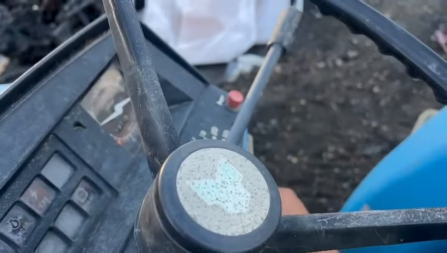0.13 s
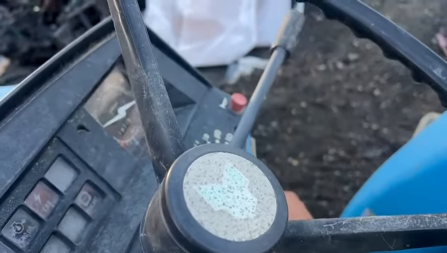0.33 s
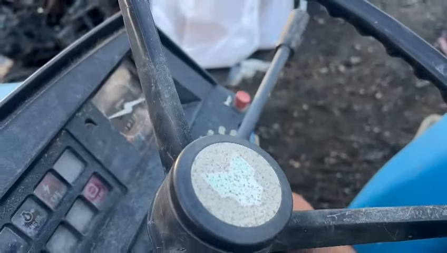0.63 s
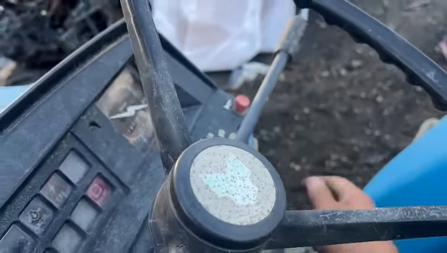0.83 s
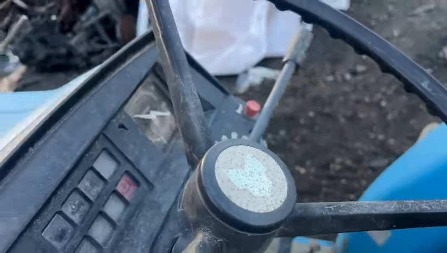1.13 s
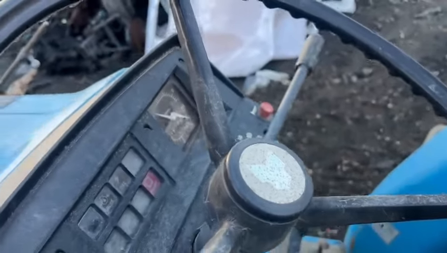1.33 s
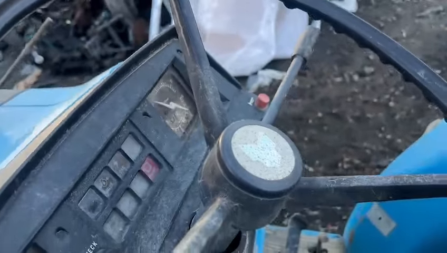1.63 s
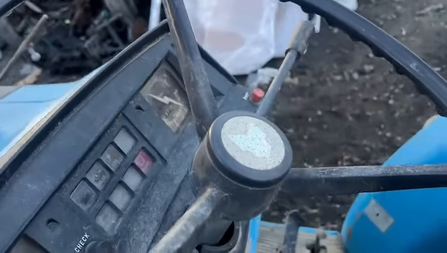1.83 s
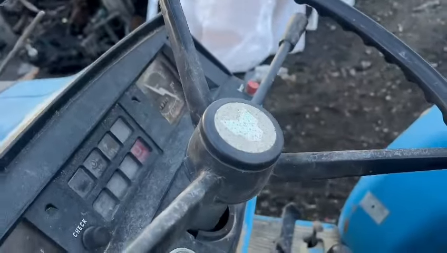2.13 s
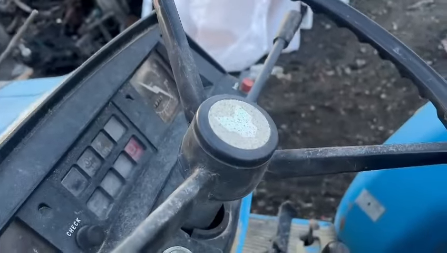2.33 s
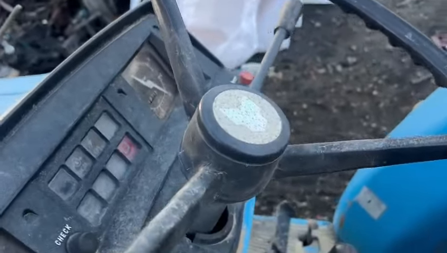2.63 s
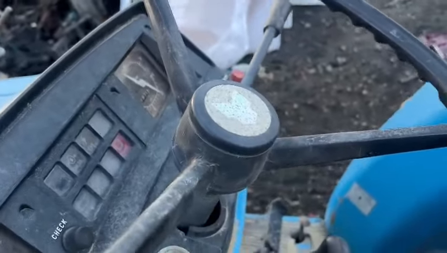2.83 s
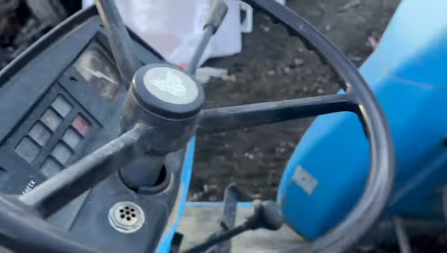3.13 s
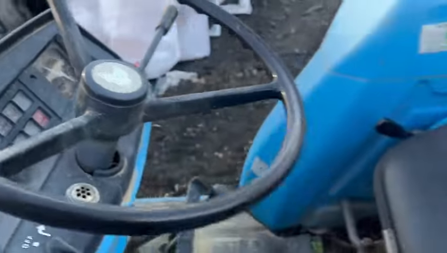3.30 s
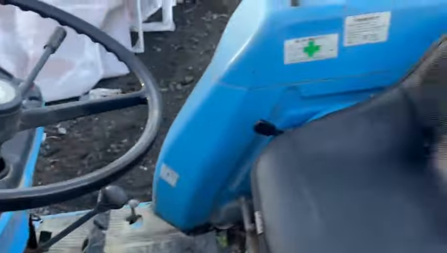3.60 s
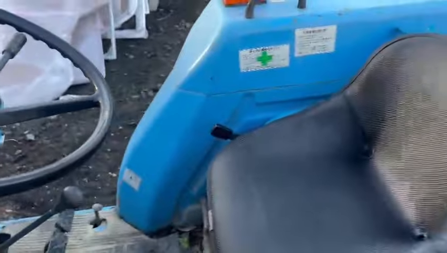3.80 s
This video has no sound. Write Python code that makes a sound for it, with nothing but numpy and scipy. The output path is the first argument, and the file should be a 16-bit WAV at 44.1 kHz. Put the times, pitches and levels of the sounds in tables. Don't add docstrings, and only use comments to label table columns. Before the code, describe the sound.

A diesel tractor engine clunks, cranks, catches within a second and settles into a rattling idle.

```python
import sys
import numpy as np
from scipy import signal
from scipy.fft import rfft, irfft, next_fast_len
from scipy.io import wavfile
from scipy.ndimage import uniform_filter1d

SR = 44100
rng = np.random.default_rng(int(sys.argv[2]) if len(sys.argv) > 2 else 0)


def gain_from_db(level_db):
    decades = np.asarray(level_db, float) / 20
    return 10 ** decades


def transcribe(signal):
    frames = np.atleast_2d(signal).T
    limited = np.clip(frames, -1, 1)
    pcm = np.round(limited * 32767).astype(np.int16)
    wavfile.write(sys.argv[1], SR, pcm)


N = 174636
TIME_S = np.arange(N) / SR


def level(x, rms_db):
    return x * gain_from_db(rms_db) / np.sqrt(np.mean(x ** 2))


def noise():
    return rng.standard_normal(N)


def band(x, hz, width_hz):
    return signal.lfilter(*signal.iirpeak(min(hz, 0.45 * SR), hz / width_hz, fs=SR), x)


def body(x, modes):
    out = 0
    for k, (hz, width_hz, db) in enumerate(modes):
        out = out + (-1) ** k * gain_from_db(db) * band(x, hz, width_hz)
    return out


def fade(x, decay_s):
    return signal.lfilter([1], [1, -np.exp(-1 / (decay_s * SR))], x)


def late(x, lag_s):
    n = next_fast_len(N + 256)
    hz = np.arange(n // 2 + 1) * SR / n
    return irfft(rfft(x, n) * np.exp(-2j * np.pi * hz * lag_s), n)[:N]


def walk(rate_hz):
    hold = int(SR / rate_hz)
    steps = np.repeat(rng.standard_normal(N // hold + 1), hold)
    return 0.95 * uniform_filter1d(uniform_filter1d(steps, hold), hold)[:N]


def curves(table):
    start_s, *columns = np.array(table).T
    return [np.interp(TIME_S, start_s, column) for column in columns]


def hiss(spectrum, flicker_db):
    table_hz, table_db = np.array(spectrum).T
    out = 0
    for hz in 30 * 2 ** np.arange(0, 8.8, 0.5):
        db = np.interp(np.log(hz), np.log(table_hz), table_db, left=-60)
        gain = gain_from_db(db + flicker_db * walk(9))
        out = out + gain * band(band(noise(), hz, hz / 2), hz, hz / 2)
    return out


def beats(cycle, angles, levels_db, scatter_db):
    jitter_cycles = 0.0019
    out, turns = np.zeros(N), np.arange(np.floor(cycle[0]), cycle[-1])
    for angle, db in zip(angles, levels_db):
        z = rng.standard_normal((len(turns), 2))
        passed = turns + angle + jitter_cycles * z[:, 0]
        at = np.interp(passed, cycle, np.arange(N), left=-1, right=-1).astype(int)
        inside = at >= 0
        np.add.at(out, at[inside], gain_from_db(db + scatter_db * z[inside, 1]))
    return out


# start_s, firing_hz
FIRING_RATE = [(0, 13), (.3, 15.9), (.4, 16.2), (.56, 20.2), (.7, 25.6), (.83, 30.9), (.95, 36.1),
               (1, 37.1), (1.32, 37.2), (1.49, 36.4), (1.6, 36.22), (3.3, 36.23), (3.96, 36.18)]


def crankshaft():
    firing_hz, = curves(FIRING_RATE)
    cycle = np.cumsum(firing_hz) / SR / 4
    return firing_hz, cycle - cycle[int(1.6 * SR)]


# firing_multiple, level_db
DRONE_LINES = [(0.5, -30), (0.75, -23), (1, 0.5), (1.5, -17), (1.75, -45), (2, -5.5), (2.25, -17),
               (2.5, -13), (2.75, -18.5), (3, 0), (3.25, -12.5), (3.5, -10), (3.75, -21), (4, 1.5),
               (4.25, -10), (4.5, -4.5), (4.75, -6), (5, -15.5), (5.25, -12.5), (5.5, -15), (5.75, -19.5),
               (6, -24.5), (6.5, -16.5), (7, -15), (8, -14.5), (9, -15), (10.5, -12), (10.75, -13.5)]
# start_s, load_db
LOAD = [
    (.65, 8),
    (.85, 6),
    (1, 3.5),
    (1.4, 3.5),
    (1.6, 0),
]


def exhaust_drone(firing_hz, cycle):
    waver_db, even_per_db, deepen_per_db, favoured_multiple = 1.4, 1.2, 0.9, 2.5
    lead_turns, spread_turns = 0.58, -0.158
    load_db, = curves(LOAD)
    out = 0
    for k, db in DRONE_LINES:
        in_between = (k % 1 > 0) * even_per_db
        off_favour = deepen_per_db * (min(abs(k - favoured_multiple), 3) - 1)
        gain = gain_from_db(db + waver_db * (walk(5) + walk(14)) - (in_between + off_favour) * load_db)
        out = out + gain * np.sin(2 * np.pi * k * (4 * cycle + lead_turns + spread_turns * k))
    catch_hz = 23.5
    return level(out, 0) / (1 + (catch_hz / firing_hz) ** 8)


# crank_angle_cycles, level_db
FIRINGS = [(0.069, -4.5), (0.327, -3), (0.572, -3), (0.816, 1)]
# crank_angle_cycles, level_db
INTAKES = [(0.201, -2), (0.437, -9.5), (.66, -5), (0.962, -16)]
# mode_hz, width_hz, level_db
PIPE = [(57, 49, -4.5), (176, 67, -0.5), (225, 17.6, 0), (252.4, 19.7, -3.5), (291, 37, -4.5),
        (318.4, 23, -1), (383, 17.3, -3.5)]
# mode_hz, width_hz, level_db
AIRBOX = [(207, 63, 4), (310, 266, -10.5), (377.5, 12, 1), (452, 42, -15), (605, 38, -9.5)]


def thumps(firing_hz, cycle):
    scatter_db = 2
    pipe = level(body(beats(cycle, *zip(*FIRINGS), scatter_db), PIPE), 0)
    air = level(body(beats(cycle, *zip(*INTAKES), scatter_db), AIRBOX), -7.5)
    rumble = level(body(noise(), PIPE + AIRBOX), -12)
    return gain_from_db(0.5) * ((pipe + air) * np.sqrt(36 / firing_hz) + rumble)


# crank_angle_cycles, ring_db, puff_db
KNOCKS = [(0.112, 1.5, -2), (0.231, -0.5, 25.5), (0.351, 1.5, 11), (.492, 0.5, 22.5), (.6, 0, 6.5),
          (.672, -12, 15.5), (.745, 4, 9.5), (0.841, -2, 12), (0.871, 0, 13), (0.991, -3.5, 24)]
# mode_hz, width_hz, level_db
BLOCK = [(990, 180, -10.5), (1300, 300, -15.5), (1710, 130, -5.5), (2323, 40, 3.5), (2260, 1900, -14),
         (2552, 280, -1)]
# band_hz, width_hz, level_db
GAS = [(4540, 540, 3), (5410, 540, 6), (7840, 770, -1.5), (10380, 4800, -8.5)]


def injector_knocks(cycle):
    scatter_db = 2.5
    angles, ring_db, puff_db = zip(*KNOCKS)
    ring = body(fade(beats(cycle, angles, ring_db, scatter_db), 0.0036) * noise(), BLOCK)
    gas = body(fade(beats(cycle, angles, puff_db, scatter_db), 0.0062) * noise(), GAS)
    gate = fade(beats(cycle, angles, np.zeros(len(angles)), 3.0), 0.004)
    return level(ring, 0.5), level(gas, 0.5), level(gate, 0)


# crank_angle_cycles, level_db
VALVES = [(.11, 9), (.27, 19), (.37, 1), (.61, 12), (.66, -2), (.77, 2), (.88, -4), (0.929, -16)]
# mode_hz, width_hz, level_db
COVER = [(530, 60, -3), (940, 160, 4), (1275, 61, -31.5)]


def valve_knocks(cycle):
    hits = fade(beats(cycle, *zip(*VALVES), 1.3), 0.0035)
    return level(body(hits * noise(), COVER), -0.5)


# band_hz, density_db_per_hz
FAN = [(300, 0.5), (700, -6.5), (950, 2), (1500, -5), (2500, -3), (4500, -22), (8500, -23.5),
       (11500, -22.5)]


def fan(gate):
    clatter_share = 0.8
    near = hiss(FAN, 2.34) * (1 - clatter_share + clatter_share * gate)
    wide = level(hiss(FAN, 2.2), 10.5)
    return level(near, 7), np.array([wide, wide[::-1]])


# start_s, drone_db, thump_db, knock_db, air_db
ENGINE_LEVELS = [(0.0, -35, -17, -46, -35.5), (0.04, -26, -42.5, -41, -42.5), (0.1, -26.5, -21, -49, -34.5),
                 (0.14, -27, -45, -44, -42), (0.19, -23, -31.5, -52, -42), (0.33, -27, -57, -39, -40),
                 (0.51, -14, -26.5, -32, -38.5), (0.6, -11, -25, -30, -37.5), (0.68, -18, -21, -48, -40),
                 (0.751, -15, -23.5, -34, -44.5), (0.862, -16.5, -21, -30, -35),
                 (1.34, -16.5, -21.5, -32, -39), (1.52, -20.5, -26, -31.5, -37),
                 (1.93, -21, -26.5, -27.5, -36.5), (2.76, -21, -25, -30, -36.5),
                 (3.96, -22, -30, -37.5, -38.5)]


def engine():
    drone_gain, thump_gain, knock_gain, air_gain = (gain_from_db(db) for db in curves(ENGINE_LEVELS))
    firing_hz, cycle = crankshaft()
    exhaust = exhaust_drone(firing_hz, cycle) * drone_gain + thumps(firing_hz, cycle) * thump_gain
    ring, gas, gate = injector_knocks(cycle)
    near, wide = fan(gate)
    running = np.clip((TIME_S - 0.96) / 0.052, 0, 1)
    block = running * (ring * knock_gain + valve_knocks(cycle) * air_gain)
    block = block + (running * gas + near) * air_gain
    return exhaust, block, wide * air_gain


# start_s, level_db, pitch_hz, treble_db
CRANKING = [(0.2737, -22, 947, -0.5), (0.3371, -19, 1230, -6), (0.37, -19.5, 1180, -20),
            (0.4048, -19, 1820, -8), (0.4659, -19.5, 1220, -31), (0.5206, -15.5, 1070, -9.5),
            (0.5695, -19, 2270, -3), (0.6138, -17.5, 945, -8), (0.653, -17.5, 1140, -9),
            (0.6748, -7.5, 1110, -18), (0.6977, -8, 802, -21), (0.7335, -14, 1990, -18),
            (0.7681, -18, 1910, -21), (0.803, -20, 2300, -21), (0.8308, -16, 1080, -12),
            (0.8639, -23, 1040, -14), (0.892, -19, 1560, -10), (0.9347, -11, 2280, -19),
            (0.9782, -16, 2300, -5)]


def cranking():
    rise_s, decay_s = 0.003, 0.007
    t, out = TIME_S[:N // 3], np.zeros(N)
    for start_s, db, pitch_hz, treble_db in CRANKING:
        u = np.maximum(t - start_s, 0)
        envelope = gain_from_db(db - 4.5) * (1 - np.exp(-u / rise_s)) * np.exp(-u / decay_s)
        burst = envelope * rng.standard_normal(len(t))
        treble = band(burst, 5200, 2000) + 0.85 * band(burst, 8400, 1600)
        knock = 9 * band(burst, pitch_hz, 240) + 3 * band(burst, 2350, 590)
        out[:len(t)] += knock + gain_from_db(treble_db + 8.5) * treble
    return out


# start_s, level_db, pitch_hz, width_hz
THUDS = [(0.019, -25, 63.6, 1.7), (0.095, -14, 180, 37), (0.209, -15, 204, 65), (0.085, -17, 921, 12),
         (.198, -25.5, 533, 9), (.2, -32, 1117, 9), (0.42, -6.5, 134.5, 94), (.493, -1.5, 210, 100),
         (0.497, -16, 423, 28), (0.609, -8, 141, 30), (.65, -14, 1110, 54), (.706, -14, 149, 35),
         (3.36, -18, 1070, 50), (0.662, -10.5, 179, 55), (0.67, -14.5, 269, 26)]


def thuds():
    out = np.zeros(N)
    for start_s, db, pitch_hz, width_hz in THUDS:
        u = TIME_S - start_s
        decay = (u > 0) * np.exp(-np.pi * width_hz * np.abs(u))
        out += gain_from_db(db) * decay * np.sin(2 * np.pi * pitch_hz * u)
    return out


# start_s, level_db, rise_s, decay_s
CLUNKS = [(0.072, -16, 0.0037, 0.0031), (0.081, -16, 0.0016, 0.0023), (0.089, -22.5, 0.0018, 0.0019),
          (.101, -36.5, .002, 0.0039), (0.177, -22, 0.0068, .004), (0.187, -12, 0.0026, 0.0021),
          (.195, -22, 0.0019, 0.0016), (.201, -30, .002, .005), (0.213, -32, 0.0024, 0.0054),
          (.648, -26, .0015, .006), (0.672, -28, 0.002, 0.005)]
# mode_hz, width_hz, level_db
CASING = [(520, 31, 2.5), (905, 110, 10.5), (1256, 124, 14), (1820, 360, 0), (2300, 300, -0.5),
          (2850, 450, 0.5), (5380, 1470, -11.5), (8480, 5800, -20)]


def clunks():
    envelope = np.zeros(N)
    for start_s, db, rise_s, decay_s in CLUNKS:
        u = np.maximum(TIME_S - start_s, 0)
        rise = np.minimum(u / rise_s, 1) ** 2
        envelope += gain_from_db(db) * rise * np.exp(-np.maximum(u - rise_s, 0) / decay_s)
    rattle = noise() * gain_from_db(0.7 * walk(340))
    return 9 * body(envelope * rattle, CASING)


# start_s, level_db
TICKS = [(0.346, -28), (0.571, -23.5), (0.735, -20.5), (1.192, -19), (1.739, -22.5), (1.851, -42),
         (2.558, -13.5), (2.564, -19), (2.84, -26.5), (3.482, -21.5), (3.751, -33), (3.808, -23),
         (3.837, -26), (3.919, -31)]


def ticks():
    hits = np.zeros(N)
    for start_s, db in TICKS:
        hits[int(start_s * SR)] = gain_from_db(db)
    return band(fade(hits, 0.004) * noise(), 7800, 7000)


# band_hz, density_db_per_hz
YARD = [(35, 6), (60, 1), (160, 1), (450, -13), (1200, -19.5), (3400, -24.5), (6000, -31), (11500, -52.5)]


def yard():
    return level(hiss(YARD, 3.2), -26)


def echoes(x):
    decay_s, low_hz = 0.025, 240
    n = np.arange(4096)
    tails = rng.standard_normal((2, len(n))) * np.exp(-n / SR / decay_s)
    x = signal.sosfilt(signal.butter(2, low_hz, "high", fs=SR, output="sos"), x)
    return gain_from_db(-6) * np.array([signal.fftconvolve(x, h / np.linalg.norm(h))[:N] for h in tails])


def scene():
    exhaust, block, wide = engine()
    clunk = clunks()
    low = exhaust + yard() + thuds()
    block = block + clunk + ticks() + cranking()
    shadowed = low - 0.37 * band(low, 268, 223)
    left = late(shadowed, 0.0002) + block + wide[0]
    right = low + late(block, 0.0004632) + wide[1]
    return np.array([left, right]) + echoes(low + block - 0.48 * clunk)


def dips(x, weak_bands):
    frame, strip_bins, top_hz, mic_low_hz = 2048, 8, 12300, 29.4
    hz, _, z = signal.stft(x, SR, nperseg=frame)
    z = z * ((hz < top_hz) / (1 + (mic_low_hz / np.maximum(hz, 1)) ** 8))[:, None]
    keep = np.ones(z.shape)
    for low_hz, high_hz, share, weight in weak_bands:
        below = np.sum(np.abs(z[(hz > low_hz / 2) & (hz < low_hz)]) ** 2, axis=0)
        mask = uniform_filter1d(below, size=9) ** weight
        for k in range(np.searchsorted(hz, low_hz), np.searchsorted(hz, high_hz), strip_bins):
            power = np.sum(np.abs(z[k:k + strip_bins]) ** 2, axis=0)
            ratio = uniform_filter1d(power, size=2) / mask
            keep[k:k + strip_bins] = ratio > np.quantile(ratio, share)
    return signal.istft(z * keep, SR, nperseg=frame)[1][:N]


# low_hz, high_hz, dropped_share, below_weight
MID_DIPS = [(3050, 3750, .5, 1.25), (6800, 7500, .72, .6), (9200, 9650, .5, .3), (9650, 10850, .91, 0),
            (10850, 11200, .4, .3), (11700, 12300, .8, 0)]
# low_hz, high_hz, dropped_share, below_weight
SIDE_DIPS = [(2300, 2600, .3, 1), (3800, 4600, .45, 1), (5900, 8200, .45, 1), (8200, 8900, .85, 1),
             (11100, 11500, .85, .3), (11500, 12300, .98, 0)]


def thin_out(left, right):
    mid = dips((left + right) / 2, MID_DIPS)
    side = dips((left - right) / 2, SIDE_DIPS)
    return np.array([mid + side, mid - side])


def low_pass(x):
    return signal.sosfilt(signal.butter(12, 13340, fs=SR, output="sos"), x)


def record(dry):
    left, right = np.tanh(0.8 * dry) / 0.81
    mix = thin_out(left, right)
    return low_pass(mix)


dry = scene()
out = record(dry)
transcribe(out)
```